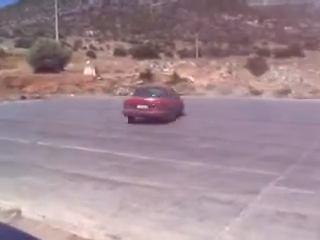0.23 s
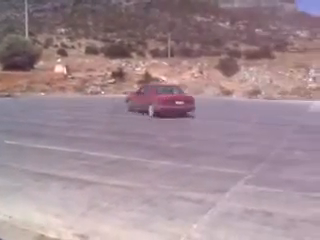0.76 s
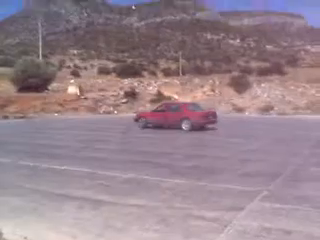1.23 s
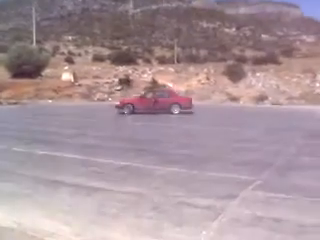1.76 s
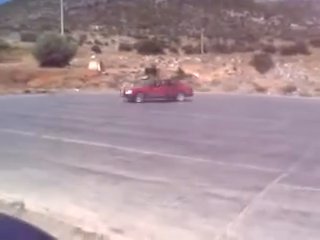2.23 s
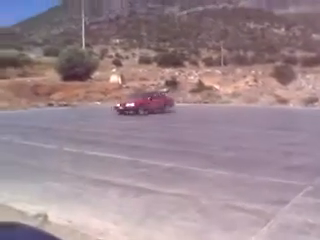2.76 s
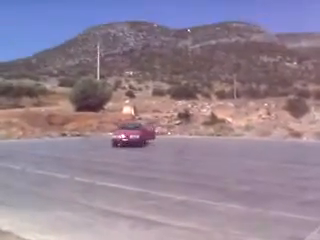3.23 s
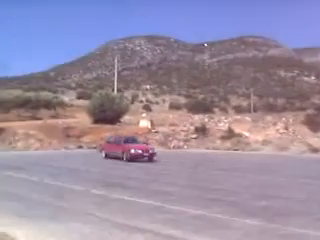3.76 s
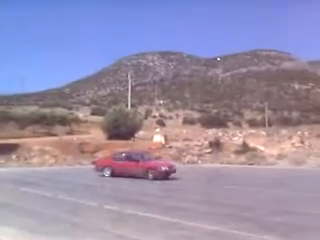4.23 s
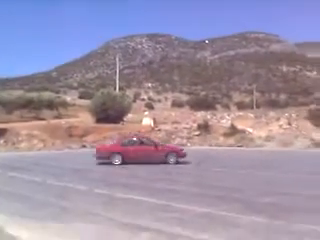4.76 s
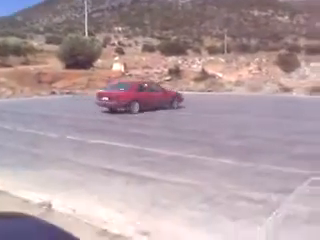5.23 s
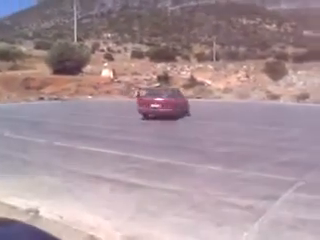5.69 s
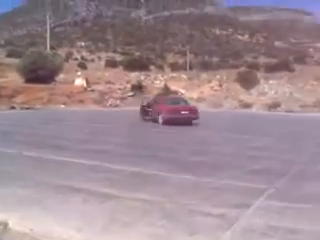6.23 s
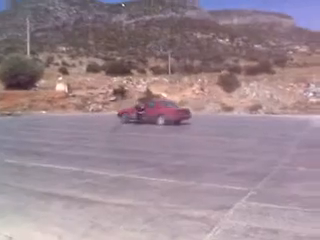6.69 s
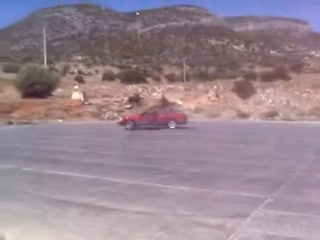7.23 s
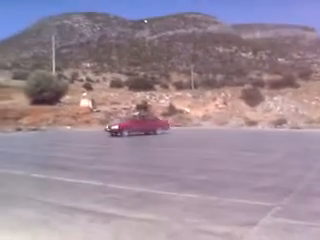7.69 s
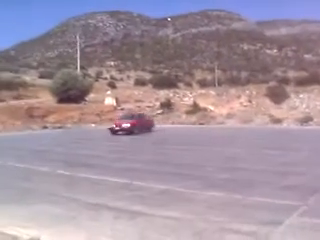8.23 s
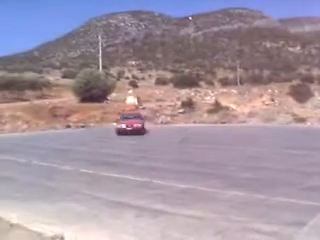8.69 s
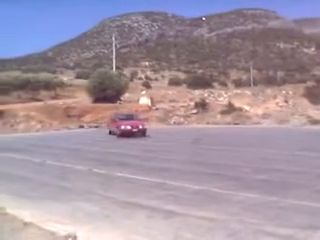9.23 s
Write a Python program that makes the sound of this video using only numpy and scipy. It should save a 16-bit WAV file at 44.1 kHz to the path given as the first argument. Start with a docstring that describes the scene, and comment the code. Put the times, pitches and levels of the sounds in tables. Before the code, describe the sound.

A car spins in circles on open asphalt some way off. Its sliding tyres screech unevenly, breaking into short gliding squeals, while the engine holds high revs underneath, swelling and fading as the car comes round. Gusts of wind buffet the small, narrow-sounding microphone throughout, and now and then it overloads with a sharp crack.

```python
"""A car spins in circles on open asphalt, some way off, its engine held at high revs.
The sliding rear tyres screech, and their tread sticks and slips in short gliding squeals.
The microphone is small and narrow-band and stands in the wind: gusts shed eddies at its port,
and now and then there is a sharp overload crack."""
import sys
import numpy as np
from scipy import signal
from scipy.fft import rfft, irfft
from scipy.io import wavfile

SR = 44100
rng = np.random.default_rng(int(sys.argv[2]) if len(sys.argv) > 2 else 0)


def transcribe(u):
    """Save the signal u as a 16-bit wav file named by the first command-line argument.

    u: samples, shape (n,) or (channels, n), limited to [-1, 1]; the rate is SR.
    q: integer samples, one column per channel.
    """
    v = np.clip(np.atleast_2d(u).T, -1, 1)
    q = np.round(v * 32767).astype(np.int16)
    wavfile.write(sys.argv[1], SR, q)


N = 417186
TIME = np.arange(N) / SR

# loudness of the sliding tyres' screech: time_s, level_db, octave_level_db
SLIDE_LEVELS = [(0, -22, -20), (.12, -26.5, -26.5), (.2, -29, -38), (.52, -26.5, -25), (.8, -31.5, -48),
                (.95, -33, -32.5), (1.2, -35, -25.5), (1.36, -50.5, -53), (1.42, -40, -27.5),
                (1.5, -41, -30), (1.68, -27, -23), (2.1, -32.5, -27), (2.3, -32, -27), (2.55, -25, -32.5),
                (2.75, -35, -37), (3.25, -20, -23.5), (3.7, -28, -44), (4.2, -20.5, -42),
                (4.75, -32.5, -47), (4.97, -30, -35), (5.08, -27, -29.5), (5.3, -24, -27), (5.6, -31, -39),
                (6.1, -22.5, -31), (6.27, -29, -33.5), (6.38, -24, -33.5), (6.7, -30.5, -30),
                (7.05, -24, -26.5), (7.5, -30, -33.5), (8.05, -34.5, -45.5), (8.13, -30, -25.5),
                (8.32, -25.5, -35.5), (8.44, -19.5, -25), (8.68, -19, -29), (8.8, -24.5, -34.5),
                (8.95, -25.5, -31), (9.46, -36.5, -36)]
# its pitch, rising and falling as the car comes round: time_s, pitch_hz
SLIDE_PITCH = [(0, 1504), (.3, 1400), (2.6, 1359), (3.8, 1392), (4.1, 1492), (5.3, 1461), (5.8, 1631),
               (6.7, 1601), (7.9, 1323), (8.8, 1423)]


def amp(db):
    """Decibels to gain."""
    return 10 ** (np.asarray(db) / 20)


def unit(x):
    """Scales to rms 1."""
    return x / np.sqrt(np.mean(abs(x) ** 2) + 1e-20)


def curves(rows):
    """Joins the rows of a table by straight lines in time, one curve per value column."""
    times, *columns = np.transpose(rows)
    return [np.interp(TIME, times, column) for column in columns]


def colour(x, points):
    """Filters by a spectrum drawn on a log-frequency axis."""
    hz, db = np.transpose(points)
    f = np.fft.rfftfreq(N, 1 / SR)
    return irfft(rfft(x) * amp(np.interp(np.log(f + 1), np.log(hz), db)), N)


def lowpass(x, hz, order=2):
    """Low-pass without delay."""
    f = np.fft.rfftfreq(N, 1 / SR)
    return irfft(rfft(x) / np.sqrt(1 + (f / hz) ** (2 * order)), N)


def wander(hz):
    """Random drift of rms 1, mostly slower than hz."""
    return unit(lowpass(rng.standard_normal(N), hz))


def flicker(depth_db, hz):
    """A random gain of rms 1 with deep dips and capped peaks."""
    return unit(amp(depth_db * wander(hz).clip(None, 1)))


def angle(hz):
    """Running phase of a pitch curve."""
    return 2 * np.pi * np.cumsum(hz) / SR


def whistle(hz, width_hz):
    """A narrow band of noise that follows a pitch curve."""
    phase = angle(hz)
    return unit(wander(width_hz / 2) * np.cos(phase) + wander(width_hz / 2) * np.sin(phase))


def tyre_scrub(waver=0.052, inner_ratio=1.19, inner_db=-7, gain_db=-2, octave_gain_db=-6):
    """Two sliding tyres screech at unsteady pitches, throbbing and surging as grip comes and goes."""
    (hz,), (db, octave_db) = curves(SLIDE_PITCH), curves(SLIDE_LEVELS)
    surge = wander(hz=11).clip(-2, 1)
    tone_level = amp(db + 2 * surge + gain_db)
    octave_level = amp(octave_db + 5.5 * surge + octave_gain_db)
    out = np.zeros(N)
    for ratio, tyre_db in ((1, 0), (inner_ratio, inner_db)):
        pitch = hz * ratio * (1 + waver * wander(hz=32))
        grip = flicker(depth_db=4.5, hz=49)
        bite = flicker(depth_db=3, hz=22)  # sharper slips put more into the octave
        tone = tone_level * whistle(pitch, width_hz=140)
        octave = octave_level * bite * whistle(2 * pitch, width_hz=290)
        out += amp(tyre_db) * grip * (tone + octave)
    return out


def engine(waver=0.004, flutter_db=2, howl_order=3.5, roar_db=-32.5):
    """Four cylinders sound firing orders and half orders over the roar of exhaust and rolling rubber."""
    # loudest when the exhaust points at the microphone: time_s, firing_hz, level_db
    revs = [(0, 187.7, -47.5), (.6, 195.6, -33), (1.4, 190, -44), (2.3, 187.5, -34), (3.3, 204.8, -51.5),
            (4, 212, -38), (5.2, 203.5, -40.5), (6.3, 203.4, -45.5), (6.85, 207, -38.5), (7.7, 203.2, -49),
            (8.6, 206.4, -59.5)]
    # the engine's lines: multiple_of_firing_rate, relative_db
    orders = [(1, -3), (1.5, -9), (2, -19.5), (3, -9.5), (3.5, -9), (4, -10.5), (4.5, -19.5)]
    # a howl on one order, strongest from the car's front left: time_s, level_db
    howl_levels = [(0, -41.5), (1.5, -45.5), (2.2, -44.5), (3.3, -37.5), (5, -49), (9.46, -48.5)]
    # the steady roar: frequency_hz, density_db
    roar_spectrum = [(100, -22), (190, 4), (310, 3.5), (480, -13), (700, -0.5), (950, -3.5), (1400, 9),
                     (2900, -3.5), (3500, -22), (4000, -9)]
    (firing_hz, db), (howl_db,) = curves(revs), curves(howl_levels)
    phase = angle(firing_hz * (1 + waver * wander(hz=16)))
    lines = np.zeros(N)
    for order, line_db in orders:
        level = amp(line_db + flutter_db * wander(hz=32))
        lines += level * np.sin(order * phase + 2 * np.pi * rng.random())
    howl = unit(amp(flutter_db * wander(hz=20)) * np.sin(howl_order * phase))
    roar = unit(colour(rng.standard_normal(N), roar_spectrum))
    return amp(db) * unit(lines) + amp(howl_db) * howl + amp(roar_db) * roar


def gust_power(attack_s=0.0021, release_s=0.0053, breakup_s=0.11, even_db=-9, contrast=1.7):
    """Dull and bright wind power: gusts rise sharply, flutter and drop back into the breeze."""
    # restless air between gusts, with its lulls: time_s, level_db
    breeze_levels = [(0, -18.5), (.18, -45.5), (.42, -33.5), (.55, -31), (1.3, -21.5), (1.4, -30.5),
                     (2.3, -24.5), (2.68, -21), (2.73, -32), (2.95, -27), (3.45, -27.5), (3.9, -24.5),
                     (5.1, -27), (5.5, -25), (5.77, -32.5), (6.95, -24.5), (7.25, -33.5), (7.5, -25),
                     (7.68, -45), (8.12, -39), (8.36, -25), (9.46, -29)]
    # strong gusts on the microphone: start_s, length_s, level_db, brightness_db
    gusts = [(.003,0.051,-15,-3), (0.072,0.039,-16.5,-6.5), (0.481,0.14,-23,-11), (0.761,0.077,-12.5,-6),
             (0.82,0.12,-16.5,-7.5), (0.924,0.0084,-12,0), (0.975,0.036,-11,-6.5), (1.048,.063,-14,-7),
             (1.128,0.035,-17.5,-4.5), (1.205,0.15,-17,-3), (1.511,0.11,-22,-8.5), (1.75,0.218,-21.5,-13.5),
             (1.83,0.0088,-7.5,-5), (2.044,0.051,-18,-15), (2.158,0.075,-20.5,-9), (2.305,0.12,-19,-15.5),
             (2.535,0.065,-18,-13), (2.614,0.021,-13,-9.5), (2.757,0.032,-16.5,-11.5),
             (2.848,0.041,-12,-6.5), (2.91,0.059,-20.5,-10), (3.019,0.032,-12,-9.5), (3.158,0.05,-21,-13),
             (3.392,0.022,-16,-12.5), (3.557,0.054,-16,-6), (3.637,0.018,-13.5,-6.5), (3.7,.028,-15.5,-3),
             (3.818,.096,-16,-9), (3.933,0.147,-20,-20), (4.062,.09,-14,-6.5), (4.178,.11,-14,-5),
             (4.37,0.074,-18,-3), (4.46,0.063,-18,-6.5), (4.544,0.15,-18.5,-4), (4.729,0.045,-21,-18),
             (4.783,0.0085,-10,-4), (4.806,.05,-16.5,-8), (4.891,0.037,-10,-2), (4.942,0.086,-15,-5),
             (5.143,0.028,-19,3), (5.285,0.14,-14,-3.5), (5.417,0.221,-16,-2.5), (5.679,0.031,-11,-3.5),
             (5.814,.12,-15,-3.5), (5.979,0.097,-16,-3.5), (6.134,0.066,-13,-6), (6.558,0.033,-14,-11.5),
             (6.617,0.074,-17.5,-3.5), (6.716,0.052,-15,-9.5), (6.979,0.042,-18.5,-12),
             (7.035,0.068,-14.5,-6), (7.167,0.025,-13,-8), (7.344,.08,-18,-8.5), (7.432,0.058,-16,-8.5),
             (7.559,0.056,-14.5,-6.5), (7.794,0.056,-12.5,-6.5), (7.891,0.04,-14.5,-8),
             (7.937,0.042,-19,-7), (8.209,0.031,-11.5,1), (8.323,0.017,-20,-14), (8.656,0.025,-17.5,-11),
             (8.713,0.031,-12.5,-8), (8.777,0.052,-15.5,-7.5), (8.883,0.051,-15.5,-8),
             (9.008,0.07,-15.5,-8), (9.114,0.015,-9,-4), (9.164,0.1,-13.5,-4), (9.37,0.085,-17,-7.5)]
    (breeze_db,) = curves(breeze_levels)
    breeze = (amp(breeze_db) * flicker(depth_db=4, hz=25)) ** 2
    flutter = flicker(depth_db=3.5, hz=42) ** 2
    dull, bright = 0.73 * breeze, 0.27 * breeze
    for start, length, db, brightness_db in gusts:
        first, last = int((start - 5 * attack_s) * SR), int((start + length + 8 * release_s) * SR)
        at = np.arange(max(first, 0), min(last, N))
        t = TIME[at] - start
        rise = (1 + np.tanh(t / attack_s - 1)) / 2
        fall = (1 + np.tanh((length - t) / release_s)) / 2
        breakup = min(length / breakup_s, 1)  # long gusts break up into full flutter
        power = amp(db) ** 2 * flutter[at] ** breakup * rise * fall
        bright_share = 1 / (1 + amp(contrast * (even_db - brightness_db)) ** 2)
        dull[at] += (1 - bright_share) * power
        bright[at] += bright_share * power
    return dull, bright


def slaps(per_s=22, rise_s=0.0024, push_db=2):
    """Single eddies slap the microphone port at random: brief extra pushes of air."""
    t = np.arange(SR // 20) / SR
    hits = (rng.random(N) < per_s / SR).astype(float)
    push = t / rise_s * np.exp(1 - t / rise_s)
    return amp(push_db) * signal.oaconvolve(hits, push)[:N].clip(0, 1)


def wind(eddy_db=4, gain_db=4, bright_db=-1, rasp_growth=1.86, rumble_db=-44.5):
    """Gusts shed eddies at the microphone port; faster air sounds brighter, and the fastest rasps."""
    # air noise at the port: frequency_hz, density_db
    air_spectrum = [(20, -40.5), (100, -35), (165, -14), (250, 0), (330, 3), (650, -2), (1100, -9),
                    (1500, -14), (2100, -23.5), (4000, -37.5)]
    dull_power, bright_power = gust_power()
    power = dull_power + bright_power
    eddies = rng.standard_normal(N) * amp(eddy_db * wander(hz=140))
    air = unit(colour(eddies, air_spectrum))
    air /= np.sqrt(lowpass(air ** 2, hz=20, order=1).clip(0.05))  # eddies share out their gust's push
    air = unit(air * (1 + slaps()))
    low = lowpass(air, hz=560, order=3)
    treble = air - lowpass(air, hz=1500, order=3)
    buffet = low * np.sqrt(dull_power) + amp(bright_db) * (air - low) * np.sqrt(bright_power)
    rasp = treble * np.sqrt(bright_power) * (bright_power / power) ** rasp_growth
    rumble = amp(rumble_db) * wander(hz=100) * np.sqrt(power)
    return amp(gain_db) * (buffet + rasp) + rumble


def faint_squeals(per_s=9.8, typical_s=0.017, pitch_spread=0.098, glide_spread_hz=96, octave_db=-10):
    """Rows for brief random squeals, scattered around the pitch and level of the slide."""
    (hz,), (db, _) = curves(SLIDE_PITCH), curves(SLIDE_LEVELS)
    places, chances = rng.random((200, 2)).T
    scatter = rng.standard_normal((len(places), 4)).clip(-2, 2)
    rows = []
    for place, chance, (stretch, detune, glide, accent) in zip(places, chances, scatter):
        if chance < per_s * N / SR / len(places):
            i = int(place * N)
            length = typical_s * np.exp(0.4 * stretch)
            pitch_hz = hz[i] * (1 + pitch_spread * detune)
            level_db = min(db[i] - 2 + 2 * accent, -26)
            rows.append((i / SR, length, pitch_hz, glide_spread_hz * glide, level_db, octave_db))
    return rows


def swell(middle, length, rise_exponent=5, fall_exponent=3.17):
    """A squeal's samples, their offset from its middle in half-lengths, and its fast-rising power."""
    at = np.arange(max(int((middle - length) * SR), 0), min(int((middle + 2 * length) * SR), N))
    place = (at / SR - middle) / (length / 2)
    power = np.exp(-abs(place) ** np.where(place < 0, rise_exponent, fall_exponent))
    return at, place, power


def tyre_squeals(jitter=0.022, rasp_rad=0.13, octave_rasp_rad=0.86, flutter_db=3.5, gain_db=1):
    """Tread blocks lock into a stick-slip tone with its octave, gliding as the load shifts."""
    # the loudest squeals: middle_s, length_s, pitch_hz, glide_hz, level_db, octave_relative_db
    loud_squeals = [(0.215, 0.043, 1393, -72.5, -20, -10.5), (0.264, 0.027, 1385, -61, -20.5, -2.5),
                    (.267, 0.025, 1730, 10, -18.5, -17.5), (0.292, 0.0064, 2060, 126, -17, -26),
                    (.323, 0.013, 1710, 45, -21, -11), (0.38, 0.015, 1330, -27, -16.5, -9),
                    (0.414, 0.025, 1666, -5, -16.5, -9.5), (0.49, 0.017, 1780, 161, -22, -18),
                    (0.541, 0.061, 1316, 53, -22, -14), (0.574, 0.036, 1650, 124.5, -22.5, -7.5),
                    (0.73, .02, 1353, -65, -19.5, -8.5), (1.69, .09, 1372, -59, -29.5, -2),
                    (2.033, 0.027, 1292, -27, -28.5, -1), (2.205, 0.025, 1308, 56.5, -22.5, -3.5),
                    (2.323, 0.046, 1300, -140, -30.5, 1.5), (2.534, .07, 1340, 0, -22.5, -5.5),
                    (3.109, .03, 1677, -400, -21, -8.5), (3.202, .045, 1398, -77, -23.5, -16.5),
                    (3.349, .07, 1385, 41.5, -22.5, -9.5), (3.474, .036, 1254, 69, -20, -15.5),
                    (3.516, 0.015, 1162, 16, -27.5, -2), (3.568, 0.029, 1395, -31, -19.5, -8.5),
                    (3.685, 0.0076, 1328, 34, -14.5, -30), (3.747, .038, 1302, 5, -25.5, -10.5),
                    (3.812, 0.052, 1420, -69, -24, -12.5), (3.982, .02, 1493, 132, -21, -8.5),
                    (5.29, .06, 1585, 55.5, -30.5, 1), (5.968, 0.044, 1650, -92.5, -21, -17.5),
                    (5.989, .014, 2080, -7, -25, -27.5), (6.113, .03, 1618, 15, -12, -17),
                    (6.414, 0.024, 1402, -54.5, -25.5, 1), (6.474, .022, 1794, 239, -23, -12.5),
                    (6.522, 0.062, 1550, -137, -21, -3), (6.796, 0.071, 1563, -136, -29, -2),
                    (6.948, 0.08, 1313, -5.5, -27.5, -5), (8.143, .06, 1547, -91.5, -35, -2),
                    (8.19, 0.037, 1355, 29, -23.5, -2), (8.491, 0.0078, 1310, -13, -20.5, -19),
                    (8.558, .022, 1338, 13, -18.5, -20.5), (8.63, 0.071, 1500, 68, -24, -13.5),
                    (8.683, .054, 1406, 351, -20, -7)]
    waver = 1 + jitter * wander(hz=97)
    flutter = amp(flutter_db * wander(hz=60))
    rasp, octave_rasp = rasp_rad * wander(hz=130), octave_rasp_rad * wander(hz=310)
    out = np.zeros(N)
    for middle, length, pitch_hz, glide_hz, db, octave_db in loud_squeals + faint_squeals():
        at, place, power = swell(middle, length)
        hz = pitch_hz + glide_hz * place.clip(-1, 1) / 2
        phase = angle(hz * waver[at])
        tone = np.sin(phase + rasp[at])
        octave = amp(octave_db) * np.sin(2 * phase + octave_rasp[at])
        out[at] += amp(db + gain_db) * np.sqrt(2 * power) * (tone + octave) * flutter[at]
    return out


def cracks(ceiling, ring_hz=2900, ring_s=0.00014, thump_hz=80, thump_s=0.0018, thump_db=-15,
           edge_hz=7000, edge_s=0.00008):
    """The overloaded microphone snaps: a brief ring, a low thump and a sharp edge."""
    # sharp overload cracks now and then in the wind: start_s, snap_db, edge_db
    overloads = [(0.792, 0, -28), (.796, 1.5, -11.5), (1.080, -18, -16), (1.725, 1.5, -20.5),
                 (2.856, -23, -38), (3.572, -16, -23), (4.07, -6, -11.5), (4.1879, 0, -14),
                 (4.1997, 3, -24), (4.2029, 0.5, -12.5), (7.076, 0.5, -75), (8.734, 0, -11.5)]
    t = np.arange(SR // 20) / SR
    ring = np.sin(2 * np.pi * ring_hz * t) * (t / ring_s) * np.exp(1 - t / ring_s)
    thump = amp(thump_db) * np.exp(-t / thump_s) * np.sin(2 * np.pi * thump_hz * t)
    edge = np.exp(-t / edge_s) * np.sin(2 * np.pi * edge_hz * t)
    snap_hits, edge_hits = np.zeros(N), np.zeros(N)
    for start, snap_db, edge_db in overloads:
        i = int(start * SR)
        snap_hits[i], edge_hits[i] = amp(snap_db), amp(edge_db)
    swing = signal.oaconvolve(snap_hits, ring + thump)[:N]
    body = ceiling * np.tanh(swing / ceiling)  # the diaphragm can swing no further
    return lowpass(body, hz=4250, order=40) + signal.oaconvolve(edge_hits, edge)[:N]


def scene():
    """The car some way off and the wind right on the microphone, in mono from one spot."""
    return (tyre_squeals() + tyre_scrub() + engine() + wind())[None]


def record(dry, ceiling=0.93, hiss_db=-16, crack_limit=0.7, band_limit_hz=15900):
    """A narrow-band microphone saturates softly and cracks. A faint hiss rises and falls with the sound."""
    # the microphone's steep treble loss: frequency_hz, gain_db
    response = [(3300, 0), (3550, -9), (3950, -9), (4200, -18.5), (4400, -27), (4600, -88)]
    squashed = ceiling * np.tanh(dry[0] / ceiling)
    hiss = amp(hiss_db) * lowpass(abs(squashed), hz=18) * rng.standard_normal(N)
    heard = colour(squashed + hiss, response)
    snaps = cracks(ceiling)
    # the microphone hears little else while it snaps
    blocked = (lowpass(abs(snaps), hz=300, order=1) * 2 / ceiling).clip(0, 1)
    heard = heard * (1 - lowpass(blocked, hz=300)) + snaps.clip(-crack_limit, crack_limit)
    band_limit = signal.firwin(511, band_limit_hz, window=("kaiser", 9), fs=SR)
    return signal.oaconvolve(heard, band_limit, "same")[None]


dry = scene()
out = record(dry)
transcribe(out)
```